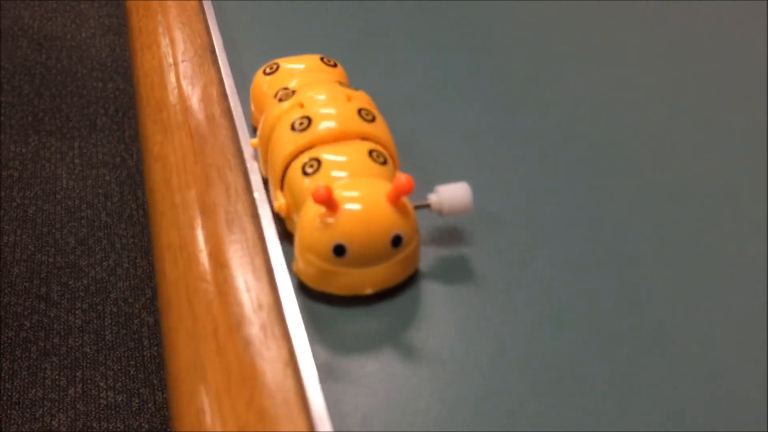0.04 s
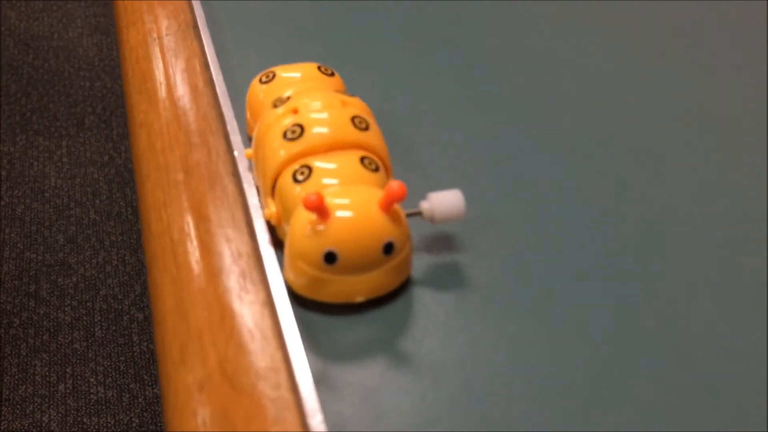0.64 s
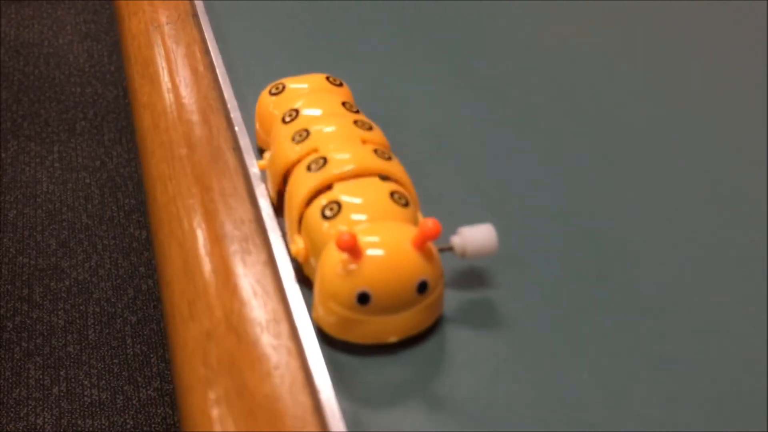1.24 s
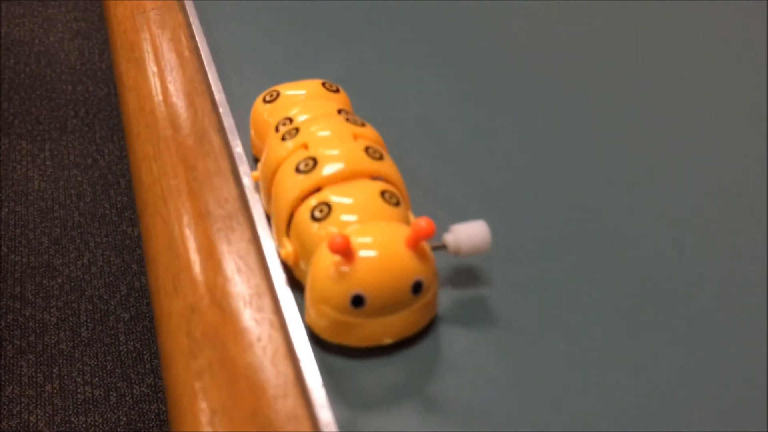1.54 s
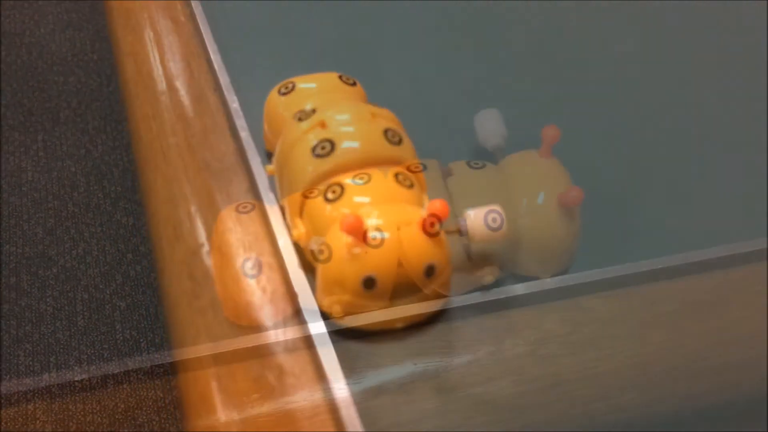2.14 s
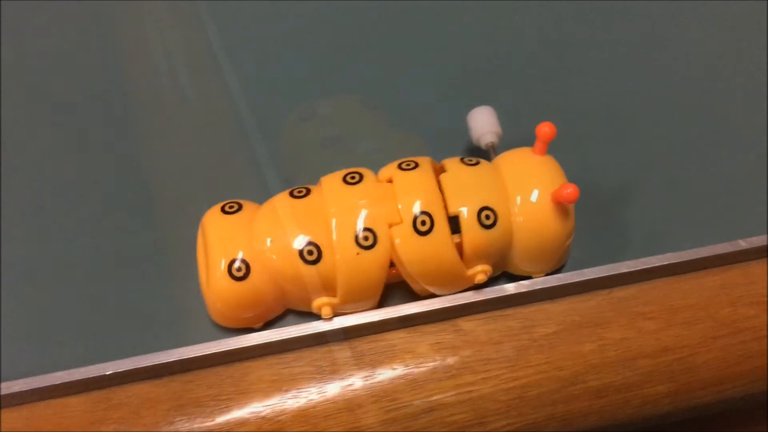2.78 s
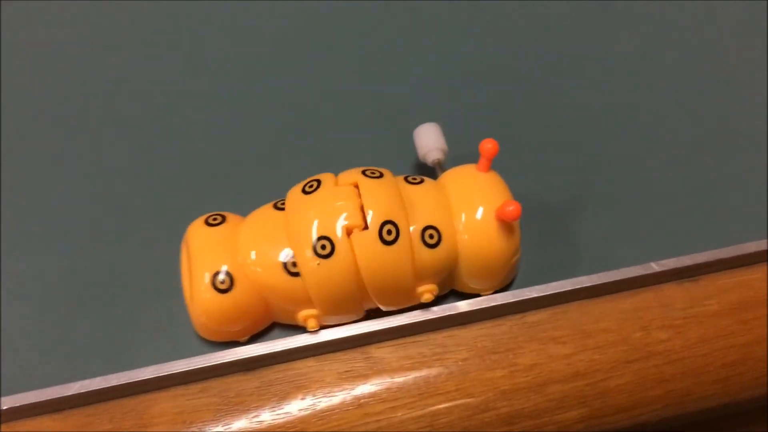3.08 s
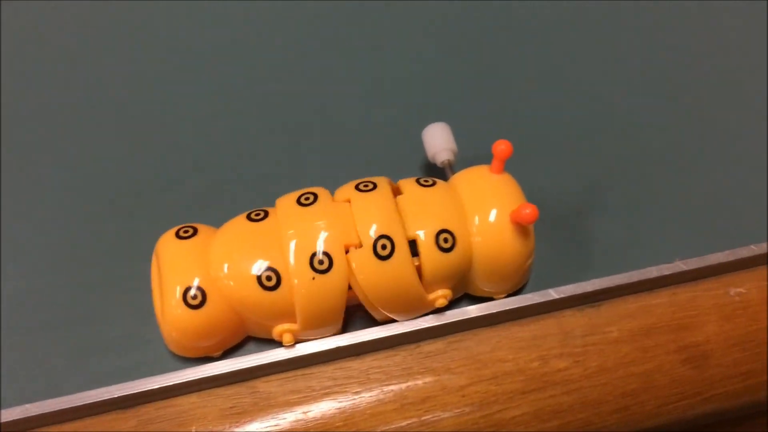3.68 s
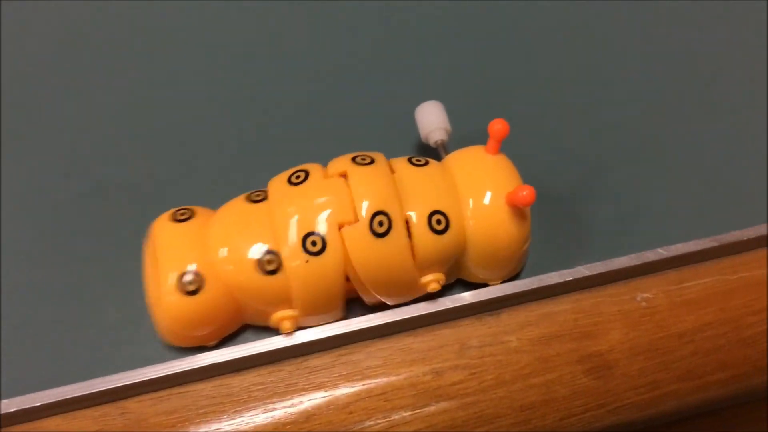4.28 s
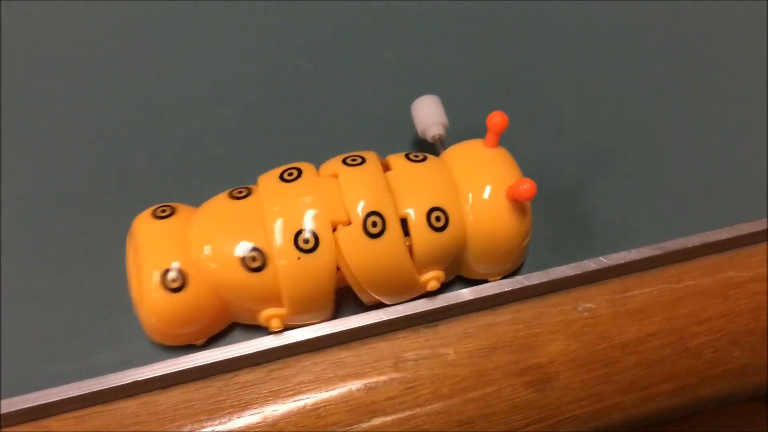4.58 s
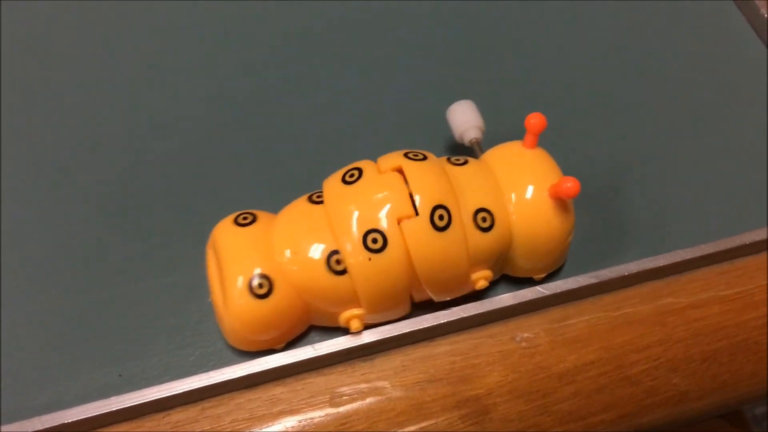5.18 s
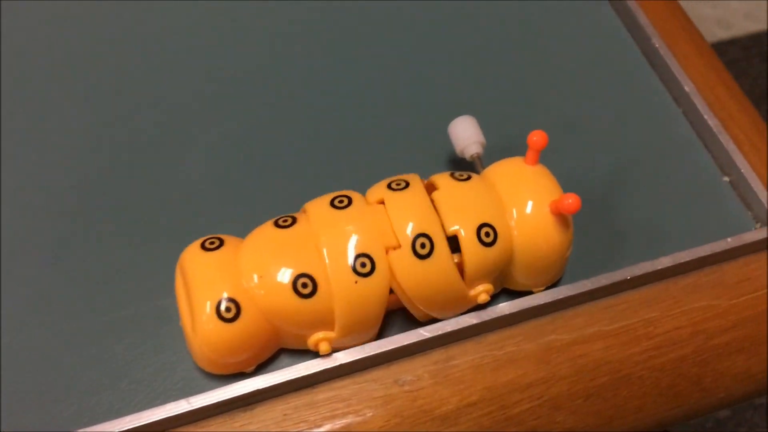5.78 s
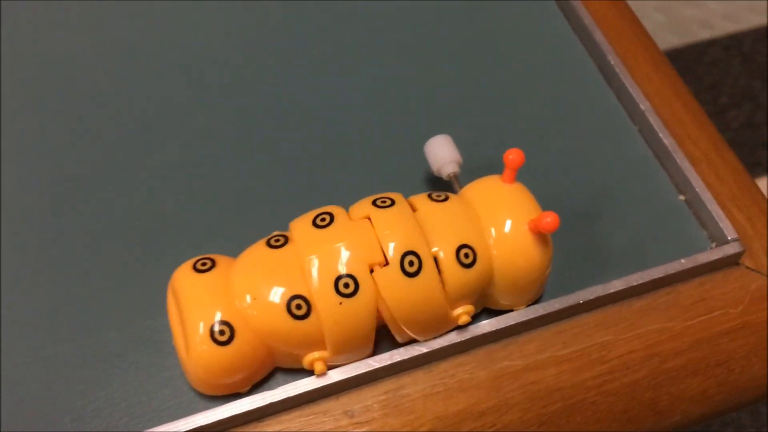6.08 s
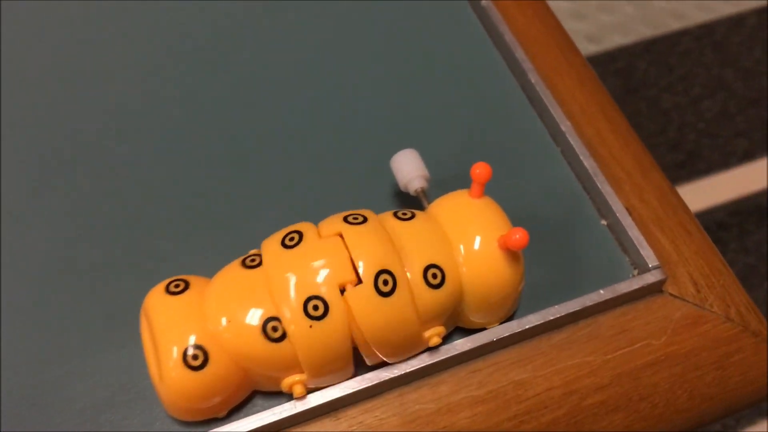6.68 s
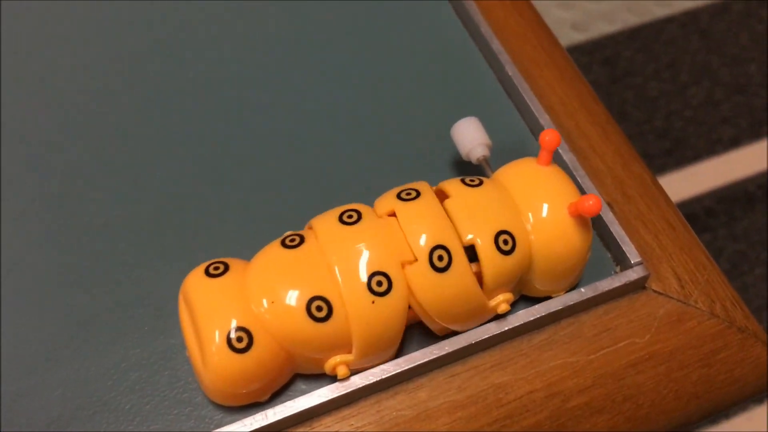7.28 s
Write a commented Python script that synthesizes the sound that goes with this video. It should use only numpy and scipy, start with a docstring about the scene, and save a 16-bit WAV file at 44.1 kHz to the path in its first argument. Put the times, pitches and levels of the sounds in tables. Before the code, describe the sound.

A wind-up plastic caterpillar rattles along a table rim, close to the microphone, from the first moment. Its clockwork ticks so fast that it blurs into a bright, dry whir, swelling and easing as the gears turn. The whir sags briefly just before 2 seconds; then a second, similar run of the toy overlaps it until about 3 seconds and carries on alone with a slightly different tone. Loose body segments give light plastic knocks, the clearest around 0.4, 1.9, 2.8, 4.5 and 6.1 seconds. From about 5 seconds the mechanism gradually slows, the rattle turns a little coarser and more uneven, and a thin, very high ring grows within it, strongest after 7 seconds. The toy is still running at the end, around 7.5 seconds. A small room adds short reverberation, and a faint, low ventilation hum continues throughout.

```python
"""A fast, close plastic rattle: a wind-up caterpillar crawls along a table rim and slowly runs down. Its
escapement strikes over a hundred times a second; each impact excites the resonances of the shell, the turning
gears modulate the level, and the middle gear knocks now and then. Two runs, one heard head-on and one from the
side, overlap for a second. Behind them a small room reverberates and its ventilation hums."""
import sys
import numpy as np
from scipy import signal
from scipy.fft import rfft, irfft
from scipy.io import wavfile
from scipy.ndimage import uniform_filter1d

SR = 44100
rng = np.random.default_rng(int(sys.argv[2]) if len(sys.argv) > 2 else 0)


def bounce(signal):
    """Save signal as a 16-bit WAV file at the path given by the first command-line argument."""
    frames = np.transpose(np.atleast_2d(signal))
    limited = np.clip(frames, -1, 1)
    pcm = np.round(limited * 32767).astype(np.int16)
    wavfile.write(sys.argv[1], SR, pcm)


N = 332073
TIME = np.arange(N) / SR
FULL_SPEED_HZ = 135  # reference rate of escapement swings


def undb(db):
    """Amplitude ratio of a level in decibels."""
    return 10 ** (np.asarray(db) / 20)


def unit(x):
    """Normalisation to an rms of one."""
    return x / np.sqrt(np.mean(x ** 2))


def curve(rows):
    """Linear interpolation of (t/s, value) rows."""
    return np.interp(TIME, *np.transpose(rows))


def log_interp(hz, points_hz, db):
    """Spectrum interpolated on a logarithmic frequency axis."""
    return np.interp(np.log(hz + 1), np.log(points_hz), db)


def walk(rate_hz):
    """Sample-and-hold noise, smoothed twice, at unit rms."""
    hold = int(SR / rate_hz)
    steps = np.repeat(rng.standard_normal(N // hold + 1), hold)
    return unit(uniform_filter1d(uniform_filter1d(steps, hold), hold)[:N])


def convolve(x, response):
    """Convolution with an impulse response."""
    return signal.fftconvolve(x, response)[:N]


def below(x, hz):
    """Gentle zero-phase low-pass."""
    return signal.filtfilt(*signal.butter(2, min(hz, .45 * SR), fs=SR), x)


# Rumble spectrum: f/Hz, relative density level/dB
RUMBLE_SPECTRUM = [(20, -39), (35, -10.5), (55, -2), (68, -5), (105, -2), (145, -4), (180, -18), (290, -14),
                   (450, -19), (900, -19.5), (4000, -35)]
# Hum tones: f/Hz, rms level at the start/dB, rms level at the end/dB
HUM_TONES = [(55, -58, -57.5), (100.4, -57.5, -67.5), (199.5, -78, -66.5), (250, -59.5, -64.5),
             (298.6, -58, -65.5), (518, -74, -64.5)]
def ventilation(rumble_db=-53.0, swell_db=1.0, waver_db=3.0, drift=0.0148):
    """Superposition of broadband rumble and hum tones that waver in amplitude and frequency."""
    hz = np.arange(N // 2 + 1) * SR / N
    colour = undb(log_interp(hz, *np.transpose(RUMBLE_SPECTRUM)))
    rumble = irfft(rfft(rng.standard_normal(N)) * colour, N)
    out = undb(rumble_db + swell_db * walk(7)) * unit(rumble)
    for tone_hz, first_db, last_db in HUM_TONES:
        phase = 2 * np.pi * np.cumsum(tone_hz * (1 + drift * walk(14))) / SR
        tone = unit(np.sin(phase) * undb(waver_db * walk(5)))
        out = out + undb(np.linspace(first_db, last_db, N)) * tone
    return out


def room(x, wet_db=-6.0, treble_db=1.5, t60_low=0.34, t60_high=0.1, split_hz=6500, count=10):
    """Diffuse reverberation, decaying faster in the treble; the shaking toy varies the echo pattern."""
    t = TIME[:SR // 3]
    patterns = np.array([walk(120) for _ in range(count)])
    fade_low, fade_high = (undb(-60 * t / t60) for t60 in (t60_low, t60_high))
    out = 0
    for share in patterns / np.linalg.norm(patterns, axis=0):
        noise = rng.standard_normal(len(t))
        low = below(noise, split_hz)
        tail = low * fade_low + (noise - low) * undb(treble_db) * fade_high
        out = out + convolve(x * share, tail / np.linalg.norm(fade_low))
    return undb(wet_db) * out


# Thin ring, growing as the spring slackens: t/s, level at resonance re the shell sound/dB
PING_LEVEL = [(0, -39), (4.8, -15), (6.5, -9), (7.15, -10), (7.3, -1), (7.53, -2)]
def ping(sound, ring_hz=11800, width_hz=900):
    """Forced resonance: a small hard part in the clockwork rings high with each tick."""
    ring = signal.lfilter(*signal.iirpeak(ring_hz, ring_hz / width_hz, fs=SR), sound)
    return ring * undb(curve(PING_LEVEL))


# Spectral envelope of toy and table top: f/Hz, relative level head-on/dB, from the side/dB
BODY_COLOUR = [(104,-36.5,-30),(297,-14,-16),(465,-27,-30),(764,-26,-28.5),(1250,-17.5,-15),(2450,-10.5,-15.5),(4830,-10,-17.5),(7230,-8.5,-8.5),(10700,-13.5,-15.5),(13000,-12.5,-13),(15700,-14.5,-14)]
# Shell resonances: f/Hz, bandwidth/Hz, height head-on/dB, height from the side/dB
SHELL_MODES = [(1506,210,5,4.5),(1933,225,6,9.5),(2277,540,4,12),(2824,120,5,0.5),(3322,450,14,12.5),(3750,780,3.5,10),(4403,750,2.5,11),(5500,650,6,9.5),(6420,390,2.5,5.5),(8720,1480,9.5,6),(9660,960,4.5,5.5),(11500,1540,1.5,4.5),(13500,600,7,5)]
def shell(view, size=2048):
    """Modal resonance: the plastic shell's impulse response, head-on (view 0) or from the side (1)."""
    hz = np.arange(size // 2 + 1) * SR / size
    body = np.array(BODY_COLOUR)
    db = log_interp(hz, body[:, 0], body[:, 1 + view])
    for centre, width, *heights in SHELL_MODES:
        db = db + heights[view] / (1 + (2 * (hz - centre) / width) ** 2)
    # Folding the cepstrum gives a causal, minimum-phase response.
    cepstrum = irfft(np.log(undb(db)))
    cepstrum[1:size // 2] *= 2
    cepstrum[size // 2 + 1:] = 0
    response = irfft(np.exp(rfft(cepstrum)))
    return response / np.linalg.norm(response)


# Swells head-on and from the side; rows are fast gear, middle gear, crank that arches the body:
# t of one crest/s, rise/turns, fall/turns, depth at full speed in lows/dB, mids/dB, treble/dB
GEAR_SWELLS_FRONT = [(0.12, 0.3, 0.24, 1.5, 2.2, 1.7), (0.229, 0.13, 0.18, 1, 2.4, 0.38),
                     (0.27, .28, 0.21, 0.6, .5, 0.68)]
GEAR_SWELLS_SIDE = [(2.044, 0.23, 0.31, 1.65, 2.7, 2.4), (2.088, 0.43, 0.089, 0.35, 0.7, 1.8),
                    (2.15, .28, .28, 1.2, 1, 1.2)]
def gear_load(speed, view, swings_per_turn=(19, 30.6, 85), limp_power=0.46):
    """Periodic loading: each wheel swells three band levels (dB) once a turn, more deeply when slow."""
    swells = (GEAR_SWELLS_FRONT, GEAR_SWELLS_SIDE)[view]
    swings, db = np.cumsum(speed) / SR, 0
    for per_turn, (crest_s, rise, fall, *depths_db) in zip(swings_per_turn, swells):
        turns = (swings - np.interp(crest_s, TIME, swings)) / per_turn
        past_crest = turns - np.round(turns)
        swell = np.exp(-(past_crest / np.where(past_crest < 0, rise, fall)) ** 2)
        db = db + np.outer(depths_db, swell - swell.mean())
    return db * (FULL_SPEED_HZ / speed) ** limp_power


def crawl(force, speed, view, hollow_hz=2650, hard_hz=5800, treble_db_per_octave=1.5):
    """Amplitude modulation: the shell's bands swell with the gears and flicker; faster is brighter."""
    sound = convolve(force, shell(view))
    low, dull = below(sound, hollow_hz), below(sound, hard_hz)
    low_db, mid_db, treble_db = gear_load(speed, view)
    low_db = low_db + 0.87 * walk(35)
    mid_db = mid_db + 1.04 * walk(45)
    treble_db = treble_db + treble_db_per_octave * np.log2(speed / FULL_SPEED_HZ) + 0.9 * walk(42)
    return low * undb(low_db) + (dull - low) * undb(mid_db) + (sound - dull) * undb(treble_db)


# The linkage gives way and the wheels run free: t/s, relative strength, duration/s
LINKAGE_SURGES = [(0.205, 2, 0.032), (0.417, 7, .025), (0.67, 4, 0.035), (1.104, 5, .025),
                  (1.187, 1.5, 0.051), (1.849, 7, 0.05), (1.96, 1, 0.049), (3.383, 0, 0.026),
                  (3.782, 6.5, 0.034), (4.317, 5, 0.021), (4.452, -0.5, .04), (4.912, 3.5, .045),
                  (5.03, 0.5, 0.039), (5.722, 2.5, 0.053), (6.143, 4, 0.03), (7.012, 6, 0.047),
                  (7.22, 3.5, .05), (7.367, 4.5, 0.037)]
# Brief dips in the rattle's loudness: t/s, relative strength, duration/s
RATTLE_DIPS = [(0.6, -0.5, 0.026), (1.902, 1, 0.021), (2.951, 1.5, 0.048), (3.934, 0.5, .05),
               (6.39, 2, 0.032), (6.513, 2, 0.027), (7.065, 1, 0.068), (7.342, 3.5, 0.029)]
def effort(speed, db_per_octave=3, onset_s=0.016, unsteady_db=.5):
    """Impact amplitude grows with speed; surges and dips shift this gain quickly, then ease off."""
    db = db_per_octave * np.log2(speed / FULL_SPEED_HZ) + unsteady_db * walk(45)
    for db_per_strength, events in ((0.5, LINKAGE_SURGES), (-2.7, RATTLE_DIPS)):
        for start, strength, length in events:
            span = slice(int(start * SR), int((start + 2 * length) * SR))
            age = np.maximum(TIME[span] - start, 0)
            envelope = np.minimum(age / onset_s, 1) * np.exp(-(age / length) ** 3)
            db[span] += db_per_strength * strength * envelope
    return undb(db)


def blows(times, sizes, length_s, peak, uneven_db, count=40, taper=3.38):
    """Backlash chatter: each blow is a run of contacts that builds as the play closes, then dies."""
    age = (np.arange(count) + rng.uniform(0, 1, (len(times), count))) / count  # fraction of the blow
    swell = np.exp(-taper * np.abs(age - peak))
    contacts = swell * undb(uneven_db * rng.standard_normal(age.shape)) * rng.choice([-1, 1], age.shape)
    contacts *= sizes[:, None] / np.linalg.norm(contacts, axis=1, keepdims=True)
    at = ((times[:, None] + age * length_s) * SR).astype(int)
    return np.bincount(np.maximum(at, 0).ravel(), contacts.ravel(), minlength=N)[:N]


# Knocks of the middle gear: t/s, energy level of the contacts/dB
GEAR_KNOCKS = [(0.4265, 3), (1.3793, -6), (1.946, -1), (2.7864, -1), (4.456, 1), (5.6326, -3),
               (6.099, 0.5), (7.173, -13), (7.37, -6)]
def gear_knocks():
    """Impact excitation: the middle gear knocks in short bursts of contacts."""
    times, levels_db = np.transpose(GEAR_KNOCKS)
    return blows(times, undb(levels_db), length_s=0.0051, peak=0.2, uneven_db=-0.5)


def escapement(speed, tock_db, jitter_s=.00025, scatter_db=3.5, mesh_db=-10.5, mesh_hz=6200, wander=.08):
    """Quasi-periodic impacts: two pallets strike the wheel in turn, one harder; gear teeth rub."""
    swings = np.cumsum(speed * (1 + wander * walk(30))) / SR
    whole = np.arange(int(swings[-1]))
    times = np.interp(np.concatenate([whole, whole + .5]), swings, TIME)  # tocks lag half a swing
    scatter, jitter = rng.uniform(-1, 1, (len(times), 2)).T
    sizes = undb(np.repeat([0, tock_db], len(whole)) + scatter_db * scatter)
    ticks = blows(times + jitter_s * jitter, sizes, length_s=.004, peak=.64, uneven_db=3.0)
    teeth = below(rng.standard_normal(N), mesh_hz)
    return unit(unit(ticks) + undb(mesh_db) * unit(teeth))


# Escapement swing rate in each run: t/s, f/Hz
SWING_RATE_FRONT = [(0, 147.7), (.4, 129.5), (.7, 136.4), (1.1, 132.5), (1.5, 132.9), (1.9, 108.1),
                    (2.4, 137.3), (2.95, 135.9)]
SWING_RATE_SIDE = [(1.95, 130.4), (3, 146.8), (3.5, 137.4), (4, 143.8), (4.4, 139.6), (4.8, 129.3),
                   (5.2, 130.8), (5.7, 123), (6.1, 112.6), (6.5, 103.5), (6.9, 102.7), (7.2, 94),
                   (7.53, 102)]
# Drive of the spring in each run: t/s, level at full speed/dB
SPRING_DRIVE_FRONT = [(0, -24.5), (1.8, -24.5), (2.15, -24.2), (2.95, -25.5)]
SPRING_DRIVE_SIDE = [(1.95, -25), (2.6, -27), (3.2, -26), (5, -25.9), (6.4, -26), (7.53, -27)]
def toy(front_ends_s=2.95, side_starts_s=1.958):
    """Source and filter: ticks and knocks drive the shell in two overlapping runs."""
    front, side = 1. * (TIME < front_ends_s), 1. * (TIME > side_starts_s)
    front_speed, side_speed = curve(SWING_RATE_FRONT), curve(SWING_RATE_SIDE)
    front_gain = undb(curve(SPRING_DRIVE_FRONT)) * effort(front_speed)
    side_gain = undb(curve(SPRING_DRIVE_SIDE)) * effort(side_speed)
    knocks = gear_knocks()
    head_on = front * front_gain * escapement(front_speed, tock_db=-6.5) + (1 - side) * knocks
    side_on = side * (side_gain * escapement(side_speed, tock_db=-7) + knocks)
    return crawl(head_on, front_speed, view=0) + crawl(side_on, side_speed, view=1)


def scene():
    """Superposition of the toy's direct sound, its reverberation and the ventilation."""
    direct = toy()
    direct = direct + ping(direct)
    return (direct + room(direct) + ventilation())[None]


def record(dry, top_hz=15830):
    """Band limiting: a steep elliptic low-pass removes the highest treble."""
    return signal.sosfilt(signal.ellip(12, .1, 80, top_hz, fs=SR, output="sos"), dry)


dry = scene()
out = record(dry)
bounce(out)
```